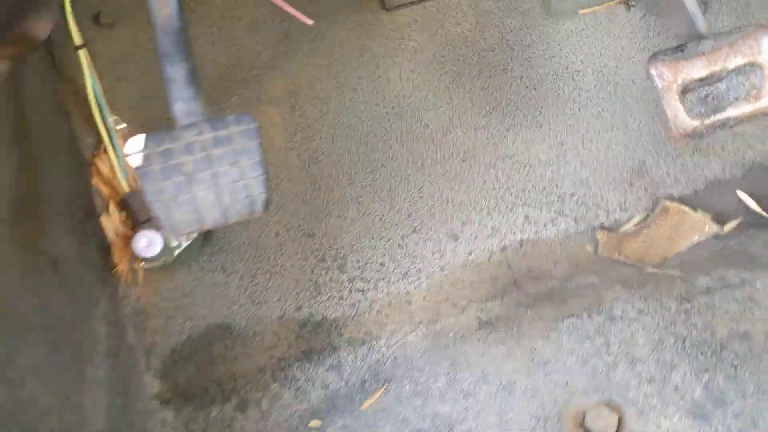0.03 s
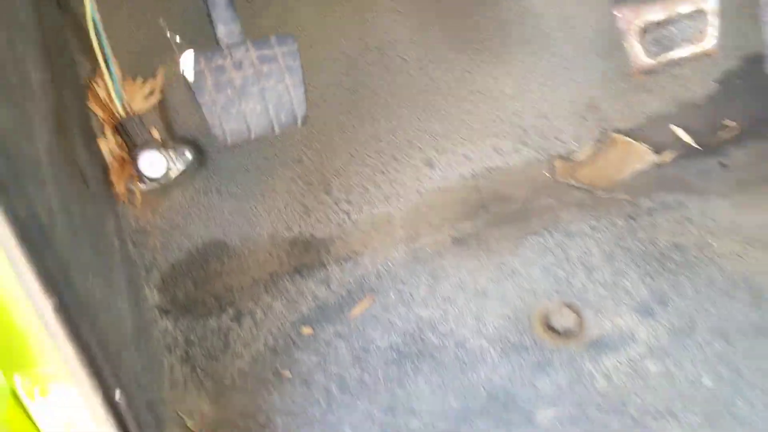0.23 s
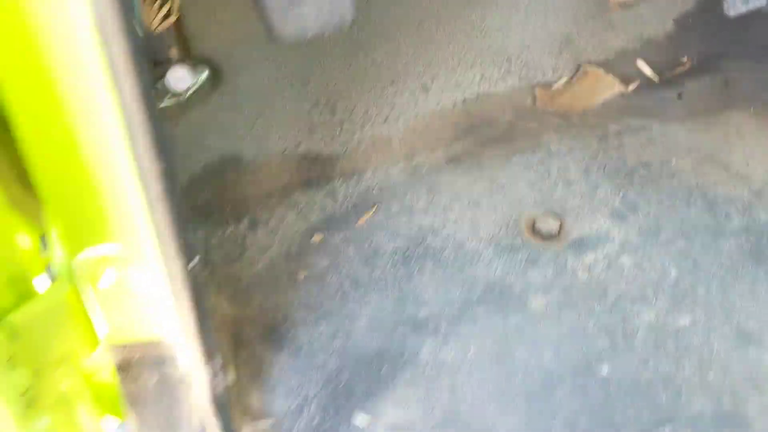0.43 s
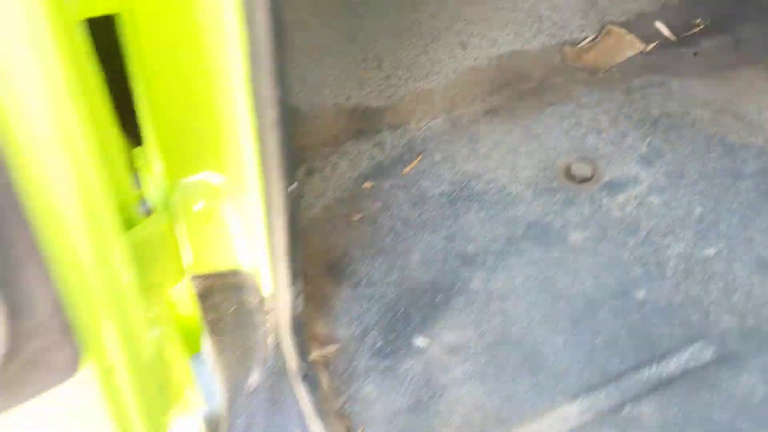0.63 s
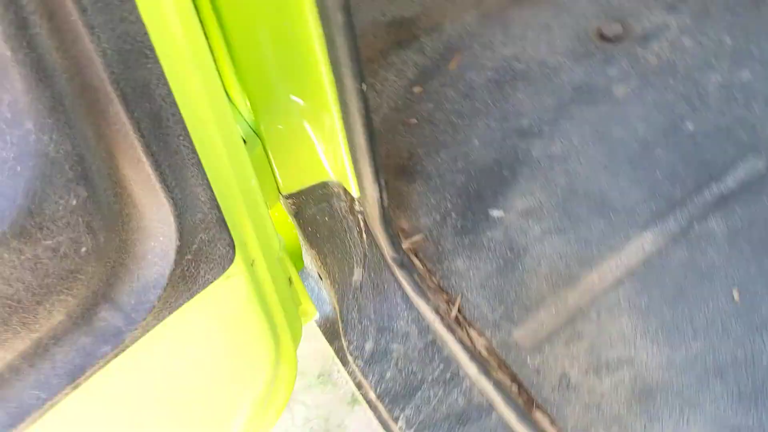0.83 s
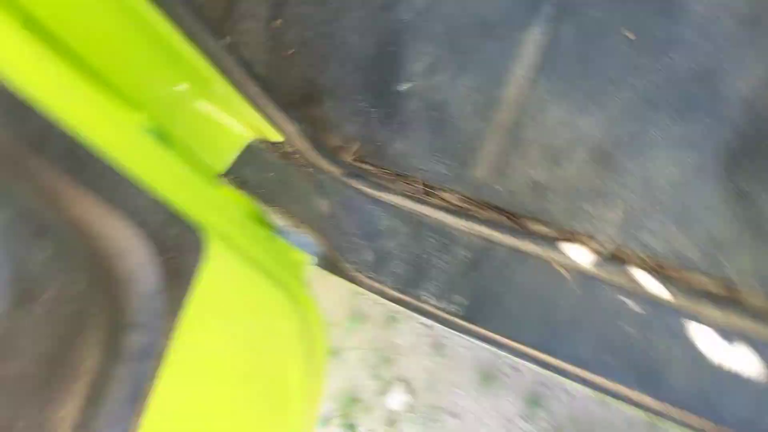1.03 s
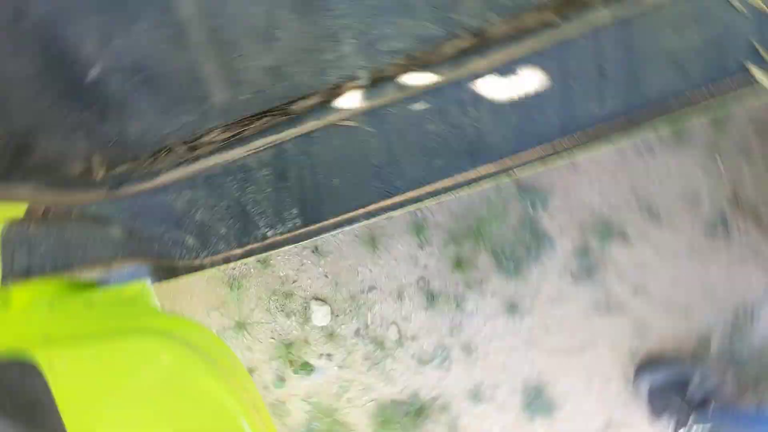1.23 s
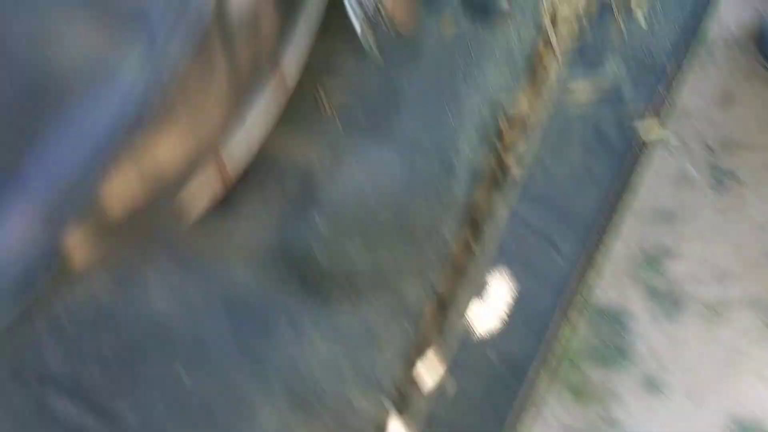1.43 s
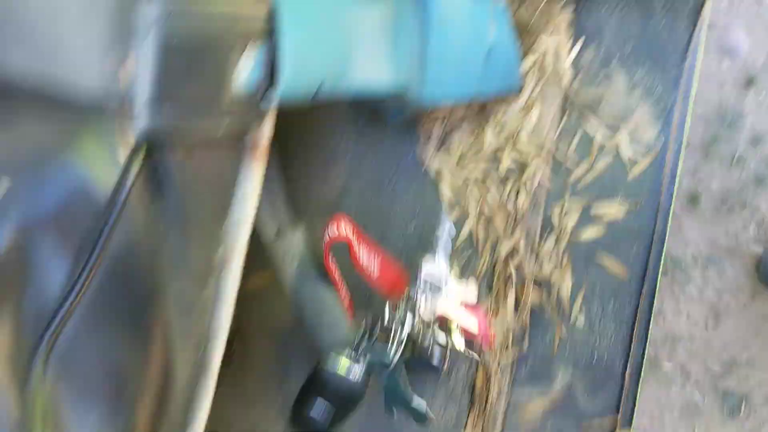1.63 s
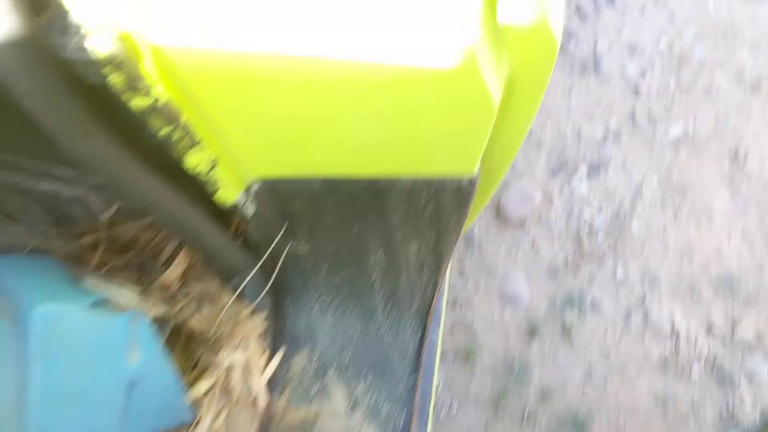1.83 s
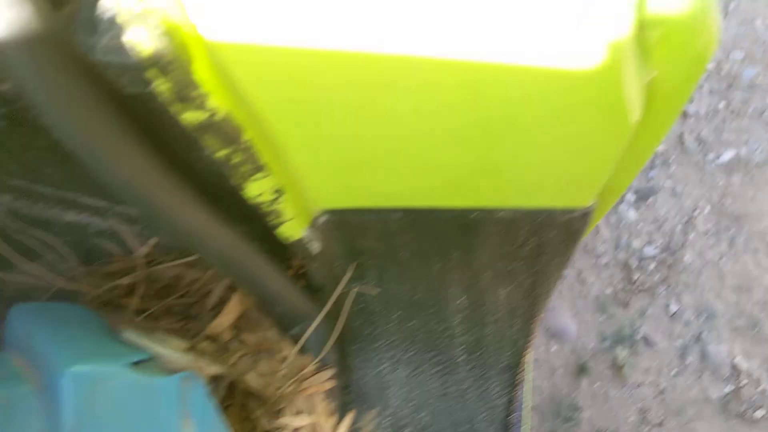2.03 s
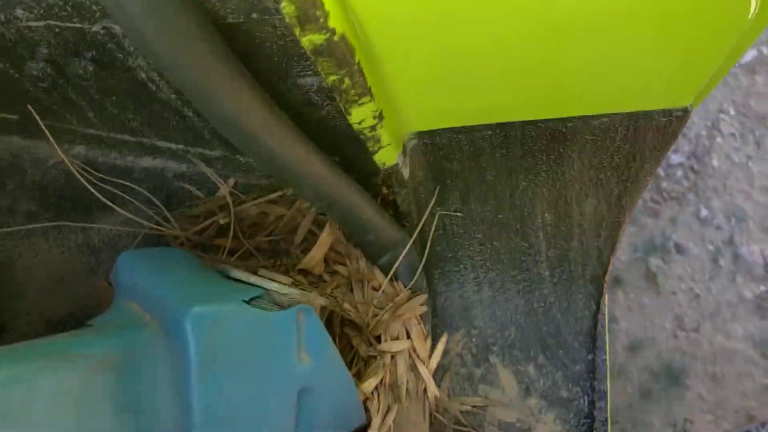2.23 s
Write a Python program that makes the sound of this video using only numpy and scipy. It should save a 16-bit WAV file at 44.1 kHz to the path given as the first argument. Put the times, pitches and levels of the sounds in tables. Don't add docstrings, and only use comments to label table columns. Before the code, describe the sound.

A bunch of keys jingles in bright, choked clinks and rattles, first in a short burst, then in longer shakes with dull trim knocks; handheld phone very close, bumped and rubbed, over faint low rumble outdoors.

```python
import sys
import numpy as np
from scipy import signal
from scipy.fft import rfft, irfft, next_fast_len
from scipy.io import wavfile

SR = 44100
rng = np.random.default_rng(int(sys.argv[2]) if len(sys.argv) > 2 else 0)


def file_out(sig):
    cols = np.atleast_2d(sig).T
    lim = np.clip(cols, -1, 1)
    pcm = np.round(lim * 32767).astype(np.int16)
    wavfile.write(sys.argv[1], SR, pcm)


def decibels_to_gain(level_db):
    exponent = np.asarray(level_db, float) / 20
    return 10 ** exponent


N = 101429
T = np.arange(N) / SR
TAIL = T[:10000]

# start_s [s], pitch_hz [Hz], level_db [dB], length_s [s]
CARRIED_RINGS = [(0.221, 15420.0, -35, 0.03), (0.264, 10104.0, -36, 0.023), (0.279, 9806.0, -41, 0.026),
                 (0.746, 13974.0, -28, 0.038), (0.763, 5357.0, -39.5, 0.035), (0.79, 5340, -38, .02),
                 (0.807, 5330, -32, .02), (0.77, 11700, -32, .025), (0.792, 8909.0, -30.5, 0.031),
                 (0.795, 14000, -27, 0.049), (0.819, 12184.0, -31.5, 0.041), (0.824, 10358.0, -36.0, 0.029),
                 (0.833, 12911.0, -38.0, 0.07), (0.836, 8291.0, -38, 0.029), (0.856, 7800, -46.0, 0.088),
                 (0.865, 10386, -35, 0.088), (0.871, 8296.0, -35.5, 0.068), (0.958, 3279.0, -38.5, 0.075),
                 (0.944, 7500, -36, .02), (0.952, 14350, -26, .07), (0.952, 12760, -33, .08),
                 (0.955, 13230, -37, .06), (0.96, 13980, -30, .03), (1.06, 5410, -42, .015),
                 (1.055, 7800, -41, .04), (1.157, 8890, -43, .04), (1.007, 8468.0, -40.5, 0.054),
                 (1.022, 14400, -31.5, 0.107), (1.164, 14388.0, -39.5, 0.043), (1.228, 14398.0, -29, 0.076),
                 (1.373, 8451.0, -43, 0.048)]
# start_s [s], pitch_hz [Hz], level_db [dB], length_s [s]
SWUNG_RINGS = [(1.535, 5453, -30, .03), (1.56, 12950, -28, .02), (1.675, 14020, -26, .03),
               (1.833, 14440, -30, .04), (1.868, 11810, -30, .04), (1.87, 10000, -38, .04),
               (1.451, 12218.0, -33.5, 0.029), (1.486, 8451.0, -38.0, 0.033), (1.579, 6540.0, -36, 0.041),
               (1.47, 3500, -45, .045), (1.579, 12958.0, -25, 0.084), (1.582, 7894.0, -37.0, 0.07),
               (1.585, 8889.0, -30, 0.04), (1.593, 10384.0, -26.5, 0.061), (1.669, 5373.0, -34, 0.025),
               (1.704, 5390, -33.5, 0.036), (1.707, 12900, -27.5, 0.045), (1.71, 8948.0, -31.0, 0.026),
               (1.727, 6450, -50, 0.061), (1.733, 7855.0, -37, 0.03), (1.739, 10376.0, -37.0, 0.038),
               (1.765, 13962.0, -35, 0.026), (1.863, 8850, -40, 0.033), (1.956, 12699.0, -29, 0.038)]
# start_s [s], peak_db [dB], strongest pitch_hz [Hz], rise_s [s]
KEY_CLINKS = [(0.0184, -33, 13000, .003), (0.0964, -21.5, 14400, .001), (0.2049, -15.5, 15500, .002),
              (0.2279, -17, 15400, .003), (0.2638, -6, 15400, .001), (0.2768, -4, 15400, .001),
              (0.3504, -20.5, 15300, .001), (0.3933, -28, 11800, .0015), (0.5146, -28, 14500, .001),
              (0.6684, -24, 11800, .001), (0.7243, -14, 14400, .002), (0.7765, -9.5, 14300, .003),
              (0.808, -14, 14000, .003), (0.95, -9, 14400, .002), (0.98, -11, 14350, .008),
              (1.007, -15, 14350, .001), (1.088, -22, 12700, .002), (1.214, -27, 12700, .002),
              (1.264, -17, 15500, .003), (1.319, -26, 11800, .001), (1.453, -12, 15200, .003),
              (1.467, -18, 14100, .002), (1.5303, -9.5, 11800, .001), (1.541, -10, 14850, .003),
              (1.5618, -8.5, 12900, .004), (1.58, -12, 11800, .004), (1.598, -12, 14000, .004),
              (1.617, -11, 14000, .005), (1.671, -4, 14020, .002), (1.686, -17, 14020, .002),
              (1.833, -10, 14400, .002), (1.868, -8, 11800, .008), (1.954, -16.5, 12700, .001),
              (2.128, -20, 14400, .002), (2.224, -21.5, 7560, .0015), (2.2894, -26, 9510, .002)]
# start_s [s], peak_db [dB], pitch_hz [Hz]
TRIM_KNOCKS = [(0.134, -15, 2100), (0.203, -18, 1520), (0.221, -24, 3340), (0.262, -22, 700),
               (0.58, -28.5, 1760), (0.594, -25, 2300), (0.627, -25, 2460), (0.679, -25, 2540),
               (0.707, -24, 1740), (0.728, -16, 2500), (1.9545, -8, 1300), (1.7055, -10, 1050),
               (0.719, -12, 1780), (0.762, -16.5, 1570), (0.81, -24, 2200), (0.891, -26, 2290),
               (0.934, -28, 2120), (0.951, -27, 3280), (1.001, -27, 2520), (1.088, -25, 2310),
               (1.215, -30, 1990), (1.443, -30, 1800), (1.513, -24, 1170), (2.135, -33, 3290),
               (2.289, -32, 2600), (0.277, -27, 800), (1.184, -25.5, 1520), (1.318, -25.5, 3830),
               (1.53, -11, 1210), (1.542, -9, 3660), (1.557, -11, 1240), (1.705, -6, 1530),
               (1.819, -18.5, 1510), (1.954, -4.5, 3265)]
# time_s [s], shake_db of the keys [dB], rub_db [dB], grip_db [dB]
HAND_MOVES = [(0, -51, -52, -66), (.08, -74, -68, -72), (.19, -40, -48, -68.5), (.22, -27.5, -42.5, -62),
              (.31, -50, -62, -69), (.5, -60, -63, -66), (.7, -43.5, -48.5, -57), (.73, -28, -37, -47),
              (.82, -27.5, -39, -44), (.88, -36.5, -44, -55), (1.02, -32.5, -42.5, -51),
              (1.14, -44, -50, -49.5), (1.26, -38, -43.5, -51), (1.51, -39.5, -51, -58),
              (1.54, -23, -33, -33), (1.68, -31, -41, -44), (1.98, -32, -36.5, -45),
              (2.2, -49, -57.5, -59.5)]
# start_s [s], peak_db [dB]
HAND_BUMPS = [(0.262, -32), (0.589, -35), (0.721, -31.5), (0.761, -28), (0.806, -26), (0.89, -31.5),
              (1.189, -36.5), (1.257, -35.5), (1.444, -35.5), (1.515, -26), (1.704, -31.5)]
# time_s [s], left_minus_right_db [dB]
BUNCH_LEAN = [
    (.2, 7),
    (.4, 3),
    (.7, 4),
    (1, 4),
    (1.3, 7),
    (1.55, 2.5),
    (1.9, 3),
    (2.3, 2),
]
# pitch_hz [Hz], level_db [dB]
BLADE_MODES = [(5370, -12), (7870, -9), (8455, -9), (8890, -6), (10385, -8), (11540, -7), (11810, -2.5),
               (12220, -6), (12720, -5), (13980, -2), (14380, 0), (14800, -5), (15440, -1.5)]
# pitch_hz [Hz], level_db [dB per Hz]
SCRAPE_COLOUR = [(2500, -17), (5500, -9.5), (7000, -8.5), (11000, -7), (14500, -1), (16000, -3.5)]
# pitch_hz [Hz], level_db [dB per Hz]
RUB_COLOUR = [(550, -9), (1350, 2), (2400, -5), (6500, -20.5)]
# pitch_hz [Hz], level_db [dB per Hz]
AIR_COLOUR = [(40, -3), (100, -17), (355, -22), (600, -29), (1540, -20), (3000, -27), (6000, -30),
              (16000, -28)]
# pitch_hz [Hz], level_db [dB]
KNOCK_COLOUR = [(750, -10), (1250, 3), (2100, -2), (3700, 1.5), (6000, -6), (12000, -14)]
BODY_COLOUR = [(170, 0), (500, 1.5)]
GROUND_COLOUR = [(45, -6), (110, -3), (150, -14)]
# detune [share of pitch], level_db [dB]
LIKE_KEYS = [(.001, -.1), (.03, -4), (.07, -6)]

RING_T60_S, CHOKE_S, RING_DB = .35, .015, 5
CRACK_S, CRACK_DB, CLINK_T60_S, CLINK_POOL_DB = .007, -14, .05, -17.5
RATTLE_PER_S, RATTLE_T60_S, RATTLE_SPREAD_DB = 1800, .06, 2.5
RATTLE_DB, SCRAPE_DB = 1.5, -6
KNOCK_S, KNOCK_T60_S, HEAVY_S_PER_DB = .004, .007, .0005
KNOCK_NOISE_DB, KNOCK_OWN_DB, TICK_S, TICK_DB = -3, -28, .0015, -9.5
RUB_DB, RUMBLE_HZ, RUMBLE_T60_S, RUMBLE_DB, BUMP_S = 3, 235, .014, 1.35, .011
HUM_HZ, HUM_DB, THROB_HZ, THROB_DB, THROB_FADES_S = 23.6, -40, 68.2, -45.5, .91
GROUND_DB, AIR_DB = -57.5, -51
WIDE_HZ, CAB_T60_S, CAB_DB = 420, .15, -12.5
TOP_HZ = 15780


def level(x, db):
    return x * decibels_to_gain(db) / np.sqrt(np.mean(x ** 2))


def noise():
    return rng.standard_normal(N)


def colour(x, points):
    hz, db = np.array(points, float).T
    size = next_fast_len(N, True)
    f = np.maximum(np.arange(size // 2 + 1) * SR / size, 1)
    octaves_outside = np.log2(np.maximum(hz[0] / f, 1)) + np.log2(np.maximum(f / hz[-1], 1))
    gain_db = np.interp(np.log(f), np.log(hz), db) - 12 * octaves_outside
    return irfft(rfft(x, size) * decibels_to_gain(gain_db), size)[:N]


def walk(rate):
    lowpass = signal.butter(2, rate / 2, fs=SR, output="sos")
    x = signal.sosfilt(lowpass, rng.standard_normal(2 * N))[N:]
    return x / x.std()


def mode(x, hz, t60):
    pole = np.exp(2j * np.pi * hz / SR - np.log(1000) / (t60 * SR))
    return signal.lfilter([1], [1, -pole], x).imag


def decay(t, t60):
    return decibels_to_gain(-60 * t / t60)


def add(out, s, x):
    i = max(int(s * SR), 0)
    out[i:i + len(x)] += x[:N - i]


def hand(axis):
    moves = np.array(HAND_MOVES)
    return np.interp(T, moves[:, 0], moves[:, axis])


def rings():
    out, t = np.zeros(N), TAIL
    for start_s, pitch_hz, level_db, length_s in list(CARRIED_RINGS) + list(SWUNG_RINGS):
        turn, beat = rng.random(size=2)
        attack = np.minimum(t / .002, 1)
        choke = np.exp(-np.maximum(t - length_s, 0) / CHOKE_S)
        waver = 1 + .25 * np.sin(2 * np.pi * (30 + 50 * beat) * t)
        tone = np.sin(2 * np.pi * (pitch_hz * t + turn))
        add(out, start_s, decibels_to_gain(level_db + RING_DB) * attack * decay(t, RING_T60_S) * choke * waver * tone)
    return out


def clinks():
    out, t = np.zeros(N), TAIL[:3500]
    hiss = level(colour(noise(), SCRAPE_COLOUR), 0)
    for start_s, peak_db, pitch_hz, rise_s in KEY_CLINKS:
        crack = hiss[int(start_s * SR):][:len(t)]
        crack = np.pad(crack, (0, len(t) - len(crack))) * np.exp(-t / CRACK_S)
        tone = 0.63 * np.sin(2 * np.pi * pitch_hz * t)
        for mode_hz, mode_db in BLADE_MODES:
            share, detune, phase = rng.standard_normal(3)
            gain = decibels_to_gain(CLINK_POOL_DB + mode_db + 4 * share)
            tone = tone + gain * np.sin(2 * np.pi * mode_hz * (1 + .012 * detune) * t + phase)
        clink = decibels_to_gain(CRACK_DB) * crack + tone * decay(t, CLINK_T60_S)
        add(out, start_s, decibels_to_gain(peak_db) * clink * np.minimum(t / max(rise_s, .0003), 1))
    return out


def rattle():
    touch = (rng.random(N) < RATTLE_PER_S / SR) * decibels_to_gain(RATTLE_SPREAD_DB * rng.exponential(size=N))
    ring = 0
    for mode_hz, mode_db in BLADE_MODES:
        for detune, key_db in LIKE_KEYS:
            share = noise() * (rng.random(N) < .15)
            hz = min(mode_hz * (1 + detune * rng.standard_normal()), TOP_HZ)
            hit = touch * share / (1 + .02 * touch)
            ring = ring + decibels_to_gain(mode_db + key_db) * mode(hit, hz, RATTLE_T60_S)
    scrape = colour(noise(), SCRAPE_COLOUR) * decibels_to_gain(3.5 * walk(39) + 2.9 * walk(200))
    return (level(ring, RATTLE_DB) + level(scrape, SCRAPE_DB)) * decibels_to_gain(hand(axis=1))


def knocks():
    blow, out, t = np.zeros(N), np.zeros(N), TAIL
    for start_s, peak_db, pitch_hz in TRIM_KNOCKS:
        fade_s = KNOCK_S + HEAVY_S_PER_DB * max(peak_db + 25.5, 0)
        burst = rng.standard_normal(len(t)) * np.exp(-t / fade_s) * np.minimum(t / .00093, 1)
        tick = rng.standard_normal(len(t)) * np.exp(-t / TICK_S)
        own = np.gradient(mode(burst, pitch_hz, KNOCK_T60_S))
        add(blow, start_s, decibels_to_gain(peak_db) * burst)
        add(out, start_s, decibels_to_gain(peak_db + TICK_DB) * tick)
        add(out, start_s, decibels_to_gain(peak_db) * level(own, KNOCK_OWN_DB))
    return out + decibels_to_gain(KNOCK_NOISE_DB) * colour(blow, KNOCK_COLOUR)


def cloth_rub():
    grain = decibels_to_gain(1.2 * walk(25) + 3 * walk(150))
    return level(colour(noise() * grain, RUB_COLOUR), RUB_DB) * decibels_to_gain(hand(axis=2))


def phone_body():
    grip = decibels_to_gain(hand(axis=3) + 2.65 * walk(36))
    for start_s, peak_db in HAND_BUMPS:
        add(grip, start_s, decibels_to_gain(peak_db - 5) * np.exp(-TAIL / BUMP_S))
    rumble = level(mode(noise(), RUMBLE_HZ, RUMBLE_T60_S), RUMBLE_DB)
    return colour(rumble * grip, BODY_COLOUR)


def hum():
    phase = 2 * np.pi * np.cumsum(THROB_HZ * (1 + .05 * walk(8))) / SR
    throb = np.sin(phase) * decibels_to_gain(THROB_DB + 2.5 * walk(10))
    throb = throb / (1 + (T / THROB_FADES_S) ** 3) * np.clip(T / .13, 0, 1)
    line = decibels_to_gain(HUM_DB + .7 * walk(3)) * np.sin(2 * np.pi * HUM_HZ * T + 1.0)
    return np.sqrt(2) * (line + throb)


def ground():
    return level(colour(noise(), GROUND_COLOUR) * decibels_to_gain(4 * walk(9) - 3 * T), GROUND_DB)


def outdoor_air():
    return level(colour(noise(), AIR_COLOUR), AIR_DB)


def ports(x, wide_db):
    def path(t60):
        echo = rng.standard_normal(len(TAIL)) * decay(TAIL, t60)
        return signal.fftconvolve(x, level(echo, 0) / np.sqrt(len(TAIL)))[:N]

    swing = 1.54 * walk(11)
    side = np.cos(swing) * path(.0056) + np.sin(swing) * path(.0067) + decibels_to_gain(CAB_DB) * path(CAB_T60_S)
    highpass = signal.butter(1, WIDE_HZ, "high", fs=SR, output="sos")
    side = decibels_to_gain(wide_db) * signal.sosfilt(highpass, side)
    mid = x + decibels_to_gain(CAB_DB) * path(CAB_T60_S)
    return np.array([mid + side, mid - side])


def scene():
    near = ports(rings() + clinks(), 1) + ports(rattle(), 1) + ports(knocks() + cloth_rub(), -1.7)
    lean_db = np.interp(T, *np.array(BUNCH_LEAN).T)
    near = near * decibels_to_gain(np.array([lean_db, -lean_db]) / 2)
    engine = hum() * decibels_to_gain(np.array([[.6], [-.6]]))
    rumble = np.array([ground(), ground()]) * .4 + ground()
    return near + ports(outdoor_air() + phone_body(), -.92) + engine + rumble


def roll_off(x):
    return signal.sosfilt(signal.butter(12, 16480, fs=SR, output="sos"), x)


def record(dry):
    cut = signal.sosfilt(signal.ellip(8, .2, 60, TOP_HZ, fs=SR, output="sos"), dry)
    mix = np.clip(cut, -1, 1)
    return roll_off(mix)


dry = scene()
out = record(dry)
file_out(out)
```